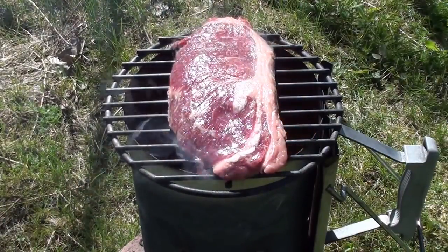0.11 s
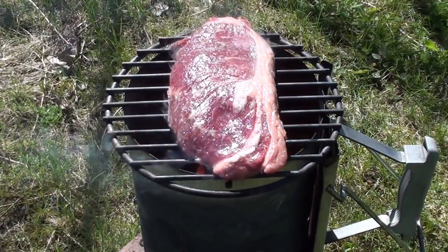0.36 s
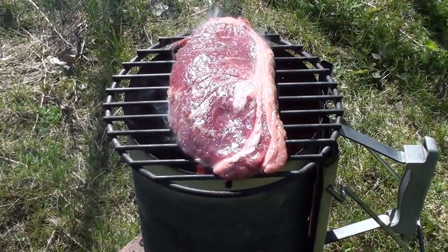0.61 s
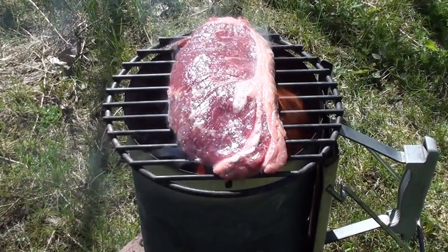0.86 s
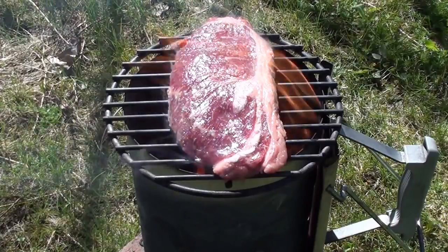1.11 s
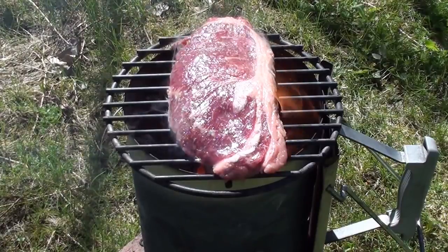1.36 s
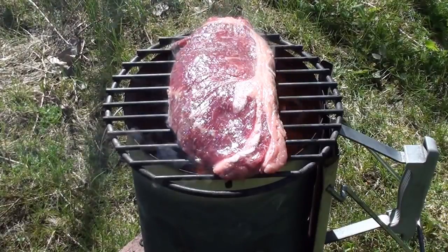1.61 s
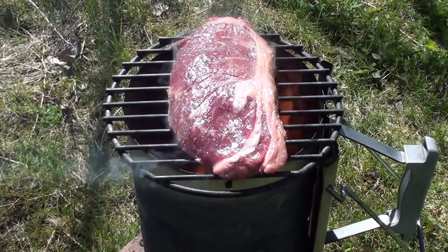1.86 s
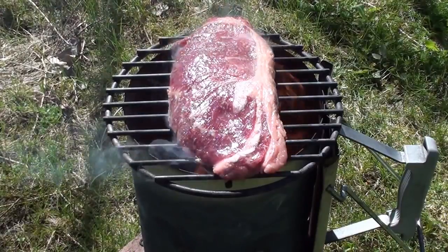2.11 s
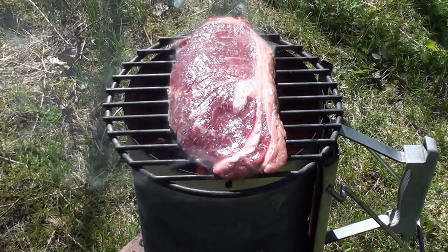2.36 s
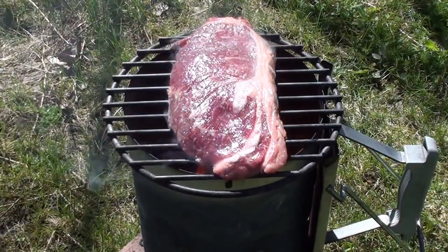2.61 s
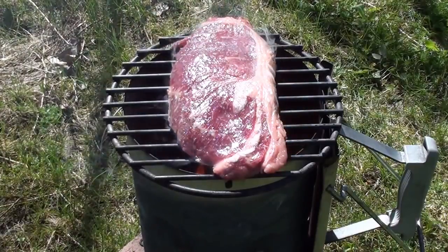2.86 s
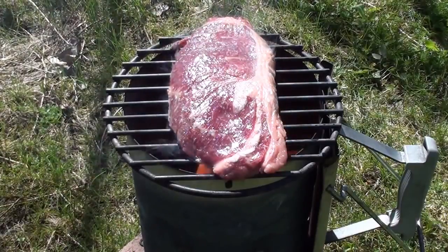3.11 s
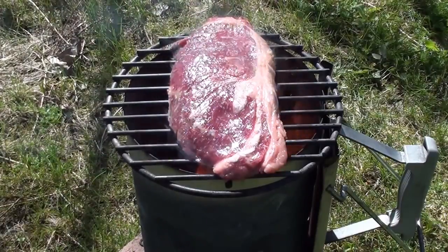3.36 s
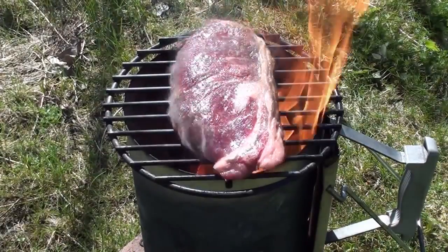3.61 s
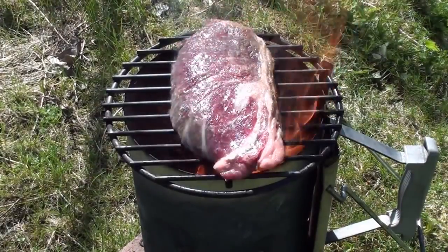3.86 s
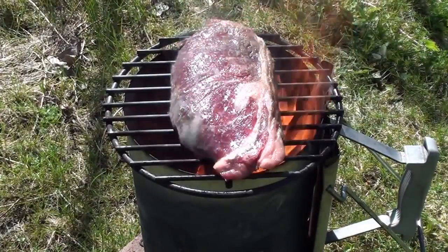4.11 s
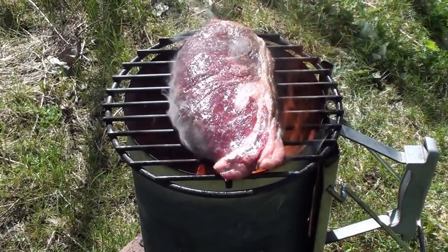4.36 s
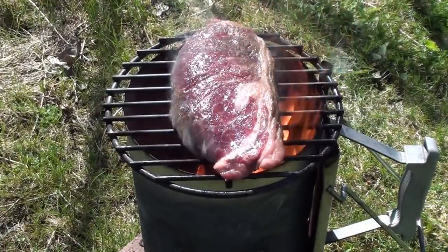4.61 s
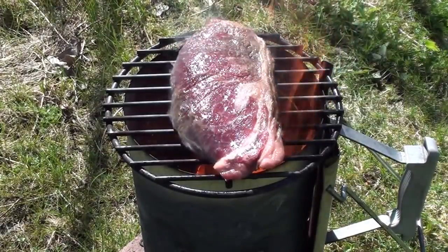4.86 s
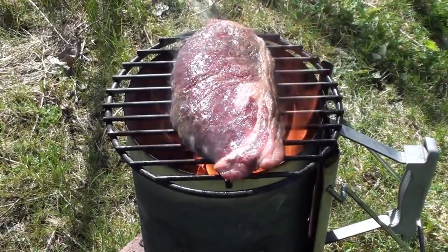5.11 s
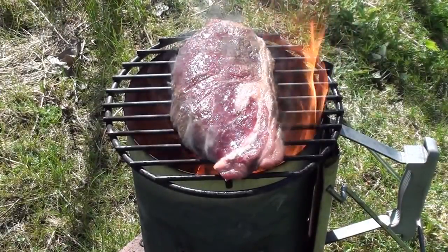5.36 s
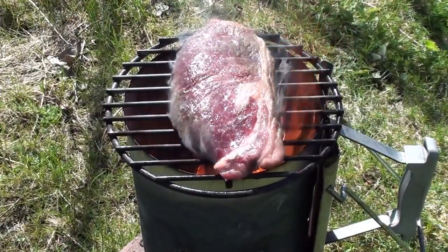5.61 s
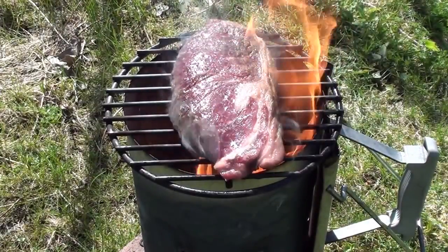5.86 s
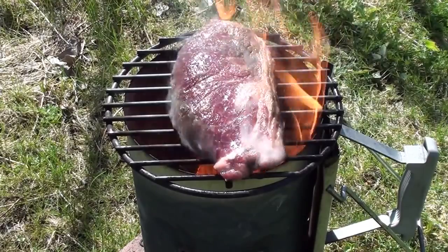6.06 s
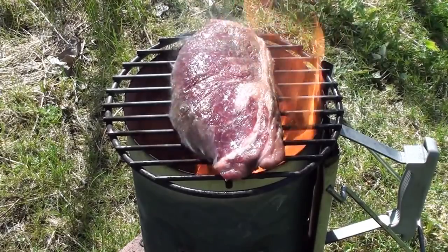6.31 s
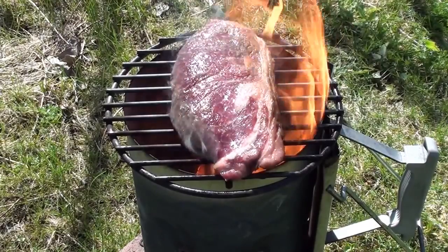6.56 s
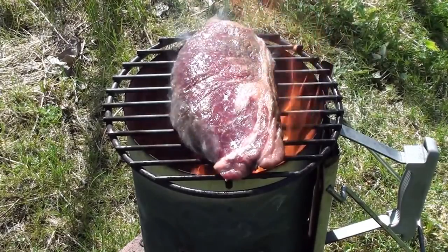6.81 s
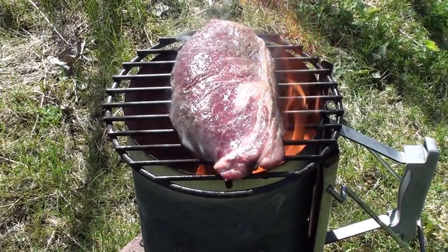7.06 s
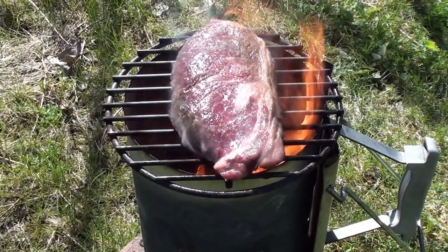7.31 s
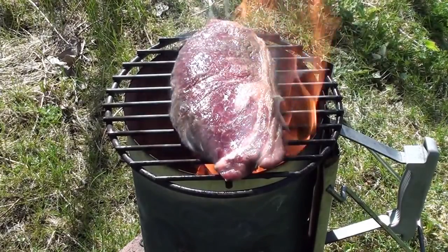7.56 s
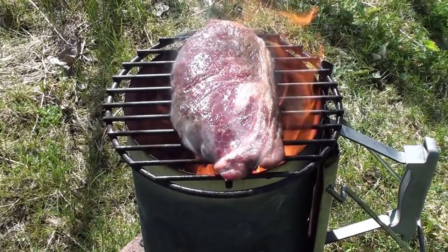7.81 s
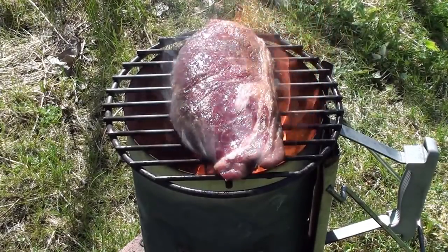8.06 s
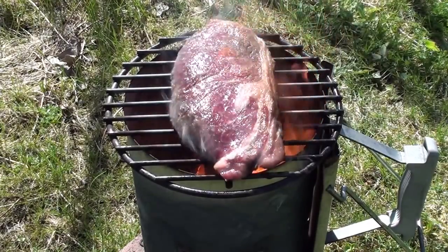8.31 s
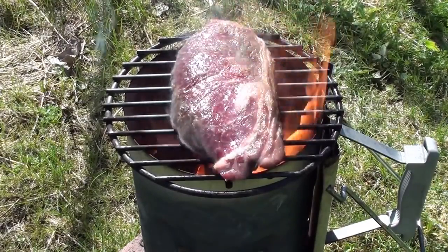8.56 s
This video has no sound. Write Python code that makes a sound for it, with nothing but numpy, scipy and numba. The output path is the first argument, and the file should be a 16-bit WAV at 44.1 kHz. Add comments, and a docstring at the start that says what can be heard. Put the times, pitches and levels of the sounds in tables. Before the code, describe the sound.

A steak sizzles fiercely over charcoal with sharp, dense crackles and hollow fat pops, early wind buffeting, and a distant engine humming late.

```python
"""On a lawn, a metre from a close pair of microphones, a steak sears on a grate over a steel chimney of charcoal.
Juice boils off as noise hiss and a dense fizz of wavelets, in spurts; fat bubbles burst as cracks and hollow knocks.
The chimney and the ground colour the sizzle and the cracks with peaks and dips.
Wind, as low fluttering noise, buffets the microphones at first; later a distant vehicle pulls away as gliding tones.
Behind it all lie a faint traffic drone, a low rumble, and faint ambience and microphone noise."""
import sys
import numpy as np
from scipy import signal
from scipy.fft import rfft, irfft
from scipy.io import wavfile
from scipy.ndimage import uniform_filter1d
from numba import njit

SR = 44100
rng = np.random.default_rng(int(sys.argv[2]) if len(sys.argv) > 2 else 0)


def wrap_up_sound(samples):
    """Save the sound to the file named by the first command line argument, as 16-bit audio."""
    columns = np.atleast_2d(samples).T
    # keep every value between -1 and 1, then stretch to whole-number steps
    tamed = np.clip(columns, -1, 1)
    steps = np.round(tamed * 32767).astype(np.int16)
    wavfile.write(sys.argv[1], SR, steps)


def how_loud(loudness_db):
    """Turn decibels into a plain amplitude multiplier (0 dB gives 1, 20 dB gives 10)."""
    steps = np.asarray(loudness_db, float) / 20
    return 10 ** steps


N = 383229
T = np.arange(N) / SR  # s
OPPOSITE = np.array([[1], [-1]])  # signs of a side signal on the two microphones


def curve(table):
    """Columns of a table after its time column, joined by lines and read at every sample."""
    s, *columns = np.transpose(table)
    return [np.interp(T, s, c) for c in columns]


def unit(x):
    """Scale to rms 1."""
    return x / np.sqrt(np.mean(x ** 2))


def noise():
    """White noise over the whole scene."""
    return rng.standard_normal(N)


def on_log(hz, points):
    """dB of (Hz, dB) points joined on a log axis."""
    f, db = np.transpose(points)
    return np.interp(np.log(hz + 1), np.log(f), db)


def response(points, dips=(), depth=1, size=2048):
    """Causal response with the given colour, from the folded cepstrum of its log gain; energy 1."""
    hz = np.fft.rfftfreq(size, 1 / SR)
    bumps = sum(d * np.exp(-.5 * (2 * (hz - f) / w) ** 2) for f, w, d in dips)
    db = on_log(hz, points) + bumps
    ceps = irfft(np.log(how_loud(depth * db)))
    # folding the late half onto the early half makes the response causal
    ceps[1:size // 2] *= 2
    ceps[size // 2 + 1:] = 0
    h = irfft(np.exp(rfft(ceps)))[:size // 2]
    return h / np.sqrt(np.sum(h ** 2))


def through(x, h):
    """Convolve and keep the length."""
    return signal.fftconvolve(x, h)[:N]


def walk(rate):
    """Random levels held 1 / rate s and slewed twice; spread 1."""
    k = int(SR / rate)
    steps = noise()[np.arange(N) // k]
    return unit(uniform_filter1d(uniform_filter1d(steps, k), k))


@njit
def grains(n, start, turn, decay, size):
    """Short wavelets: each swells and dies as t exp(-t), with height 1 at its crest, times its size."""
    out = np.zeros(n)
    for g in range(len(start)):
        z, p = np.e * decay[g] * size[g] + 0j, np.exp(1j * turn[g] - decay[g])
        for k in range(min(int(8 / decay[g]) + 1, n - start[g])):
            out[start[g] + k] += (k + 1) * z.real
            z *= p
    return out


def ring(s, hz, cycles, size):
    """Wavelets that begin at times s and crest after the given number of cycles."""
    hz = np.clip(hz, 100, .42 * SR).ravel()
    start = np.clip(s * SR, 0, N - 1).astype(np.int64).ravel()
    return grains(N, start, 2 * np.pi * hz / SR, hz / SR / cycles, 1. * size.ravel())


# Colour of the distant traffic: f/Hz, level/dB (per Hz, relative)
RUMBLE_COLOUR = [(15, -38), (25, -17), (32, -8.5), (97, 0), (156, 0.5), (198, -1.5), (300, -9.5),
                 (390, -30), (660, -120)]


def rumble():
    """Far traffic: low coloured noise that drifts slowly in level, the same on both microphones."""
    level = how_loud(-49 + 0.38 * walk(1.5))
    return level * unit(through(noise(), response(RUMBLE_COLOUR, size=8192)))


def tone(table, orders=((1, 0),)):
    """Tones on multiples of a gliding pitch, wavering as they cross the air; they fade in and out."""
    hz, db = curve(table)
    edge = np.clip(np.minimum(T - table[0][0], table[-1][0] - T) / 0.068, 0, 1)
    turns = 2 * np.pi * np.cumsum(hz) / SR
    tones = sum(how_loud(db + rel_db + 0.55 * walk(5)) * np.sin(k * turns) for k, rel_db in orders)
    return np.sqrt(2) * edge * tones


# Farther traffic drone: t/s, f/Hz, level/dB (rms before the wavering)
DRONE_GLIDE = [(1.8, 128, -60), (2.01, 146.0, -55.5), (6.5, 178, -66)]


def drone():
    """Farther traffic: one faint tone that glides upwards."""
    return tone(DRONE_GLIDE)


# Distant vehicle pulling away: t/s, firing f/Hz, level/dB (rms, to which each tone adds its own level)
ENGINE_RUN = [(4.5, 44, -58), (4.92, 46.6, -55), (5.1, 61.8, -51), (5.27, 81.5, -43), (5.5, 93.3, -47),
              (6.2, 97.3, -52), (6.5, 102, -46), (6.65, 106.3, -48), (7.05, 107, -48), (7.48, 121, -42.5),
              (7.85, 125, -43), (8.1, 123.8, -46.5), (8.38, 114, -48), (8.6, 91.3, -62)]
# Tones that follow the engine speed: multiple of the firing f, level/dB (relative)
ENGINE_ORDERS = [(1, -0.5), (0.62, -6), (2, -15)]


def vehicle():
    """Engine tones locked to the firing rate, rising and falling with the engine speed."""
    return tone(ENGINE_RUN, ENGINE_ORDERS)


# Colour of the wind at the microphones: f/Hz, level/dB (per Hz, relative)
BUFFET_COLOUR = [(15, -65), (25, -13), (103, 2.5), (190, -6), (248, -19.5), (375, -21), (500, -27),
                 (650, -42), (1100, -120)]
# Gusts on the microphones: t/s (crest), level/dB (shared part at the crest), rise/s, fall/s (to 1/e)
GUST_CRESTS = [(0.05, -44, .06, .2), (0.33, -38, 0.14, 0.15), (0.54, -29.5, 0.045, 0.072),
               (0.65, -36.5, 0.046, 0.055), (0.96, -40, 0.07, 0.076), (1.14, -35.5, .04, 0.034),
               (1.27, -46, .05, 0.17)]


def wind():
    """Gusts of low buffeting noise that flutters; the microphones share only part of it."""
    colour = response(BUFFET_COLOUR, size=8192)
    mid, side = (unit(through(noise() * how_loud(3.1 * walk(23.4)), colour)) for _ in range(2))
    gusts = 0
    for s, db, rise, fall in GUST_CRESTS:
        distance = np.where(T < s, (s - T) / rise, (T - s) / fall)
        gusts = gusts + how_loud(db) * np.exp(-distance)
    return gusts * (mid + how_loud(-8) * side * OPPOSITE)


# Colour of the ambience and microphone noise: f/Hz, level/dB (per Hz, relative)
AMBIENCE_COLOUR = [(60, -17), (200, -3.5), (700, 1.5), (1050, -1.5), (1400, -12), (2400, -22.5),
                   (15000, -33)]


def ambience(boil_db):
    """Faint ambience and microphone noise, unlike on the two sides, slightly stronger with the boiling."""
    level = how_loud(-61.5 + 0.17 * (boil_db - np.mean(boil_db)))
    return unit(through(noise(), response(AMBIENCE_COLOUR))) * level


# Colour of the sizzle at the microphones: f/Hz, level/dB (per Hz, relative)
SIZZLE_COLOUR = [(150, -15.5), (300, -8), (600, -5.5), (1100, -4.5), (2100, -10), (3500, -8), (5000, -5.5),
                 (5900, -2.5), (7500, -4.5), (9200, 0), (11000, -4.5), (12200, -9), (14000, -9),
                 (15600, -10.5)]
# Narrow bands cancelled or lifted by echoes from chimney and ground: f/Hz, width/Hz, level/dB
ECHO_BANDS = [(830, 194, -5.5), (1374, 240, -6.5), (2410, 190, -7), (2940, 214, -5.5), (4020, 220, -3.5),
              (5460, 270, -1.5), (6960, 160, -5), (8310, 540, -2), (2200, 480, 3.5), (11200, 470, 0.5)]
# Resonances of the cool air around the grate: f/Hz, width/Hz, level/dB
AIR_HOLLOWS = [(6000, 210, 2), (7600, 220, 1.5), (9000, 260, 2)]


def chimney(rise=1, depth=1):
    """Path from grate to microphones: echoes and air resonances, the latter raised in pitch by heat."""
    hollows = [(hz * rise, w, db) for hz, w, db in AIR_HOLLOWS]
    return response(SIZZLE_COLOUR, ECHO_BANDS + hollows, depth)


def heated(juice):
    """Sizzle through the chimney; flames heat the air and raise its resonances by 6 %."""
    cool, hot = (through(juice, chimney(rise)) for rise in (1, 1.06))
    heat = np.clip((T - 3.75) / .3 + .5, 0, 1)  # crossfade centred on 3.75 s, 0.3 s long
    return cool + heat * (hot - cool)


# Steady boiling: t/s, level/dB (sizzle, before the surges)
STEADY_BOIL = [(0.0, -28.5), (0.7, -28), (1.1, -28), (1.7, -28), (2.3, -27.5), (3.0, -28.5), (3.7, -25.5),
               (3.85, -31.5), (4.9, -31), (5.4, -30), (6.3, -28.5), (6.9, -28.5), (7.4, -29), (7.9, -29.5),
               (8.69, -28)]
# Juice runs onto the hot bars and boils up: t/s (full height reached), hold/s, level/dB (lift),
# level/dB (change of the lower sizzle, up or down)
JUICE_SURGES = [(0.146, 0.083, 2, 1), (0.383, 0.16, 3, 0.5), (0.758, 0.19, 3.5, 2.5), (1.265, 0.15, 4, -1),
                (1.926, 0.082, 3.5, 2), (2.359, 0.1, 4, -3), (3.02, 0.086, 2.5, 0.5), (3.401, 0.19, 3.5, 0),
                (3.962, 0.077, 4.5, -1.5), (4.24, 0.1, 2.5, -1.5), (4.707, 0.082, 2.5, -2),
                (5.077, .1, 1.5, 1), (5.534, .05, 1, -1.5), (5.81, 0.1, 3, -2), (6.35, 0.19, 2, -0.5),
                (8.006, 0.048, 4, -1.8), (8.414, .1, 1, -1)]


def boiling():
    """Level of the sizzle and change of its lower part in dB: steady boiling plus surges that die away."""
    start, hold, lift_db, low_db = np.transpose(JUICE_SURGES)[:, :, None]
    attack_s, release_s = 0.02, 0.027
    rise = np.clip((T - start) / attack_s + 1, 0, 1)
    fall = np.exp(-np.clip(T - start - hold, 0, None) / release_s)
    shape = rise * fall
    return curve(STEADY_BOIL)[0] + np.sum(lift_db * shape, axis=0), np.sum(low_db * shape, axis=0)


# Bubbles bursting at set times, loud and soft: t/s, level/dB (nominal peak of the crack), f/Hz (crack)
SET_POPS = [(0.2017, -5, 9150), (0.2536, -5, 8200), (0.2703, -5.5, 7250), (0.7738, -8, 7760),
            (0.815, -10, 7000), (0.8378, -7.5, 5700), (0.9392, -11.5, 6200), (0.9844, -3, 8000),
            (1.1547, -9, 6700), (1.1978, -5.5, 7760), (1.3015, -7, 8200), (1.3115, -12, 9000),
            (1.3861, -10, 10400), (1.4366, -6.5, 7600), (1.454, -8, 10600), (1.5924, -5.5, 8000),
            (2.0627, -5.5, 8000), (2.1593, -7, 8850), (2.372, -8.5, 3570), (2.3877, -7, 9000),
            (2.512, -10, 12000), (2.8371, -20, 9400), (2.8685, -13, 10300), (3.0422, -11, 6000),
            (3.2682, -7.5, 6800), (3.3958, -5, 8700), (3.444, -5, 6700), (3.4596, -2, 10200),
            (3.5033, -6, 7500), (3.642, -6, 10200), (3.7605, -15, 10000), (3.9146, -7, 10400),
            (4.097, -6, 11200), (4.1439, -5.5, 9900), (4.2405, -15, 8550), (4.281, -8, 12100),
            (4.3105, -7.5, 7400), (4.4094, -14, 10800), (4.5093, -2, 11900), (4.5553, -5, 10700),
            (4.7183, -9, 6940), (4.761, -7, 12000), (4.8443, -4.5, 7600), (5.0656, -5, 9800),
            (5.1093, -5.5, 9000), (5.2639, -6.5, 12200), (5.287, -4.5, 11600), (5.5455, -2, 11000),
            (5.6429, -7, 11020), (5.6784, -6.5, 10500), (5.7733, -2, 9500), (5.8988, -9, 11200),
            (5.9584, -4.5, 7260), (5.9652, -7.5, 7200), (6.0173, -4, 11530), (6.0283, -3.5, 5400),
            (6.0619, -8, 8700), (6.1245, -6, 6370), (6.168, -10, 6500), (6.2257, -9, 9600),
            (6.3433, -7.5, 12670), (6.3622, -11, 6300), (6.3853, -5, 11800), (6.5906, -10, 8140),
            (6.9024, -8, 9200), (6.9715, -15, 12100), (6.9778, -5.5, 9600), (7.0138, -9, 8300),
            (7.0205, -14, 12100), (7.083, -21, 10400), (7.3392, -10, 6480), (7.436, -5.5, 9900),
            (7.4882, -11, 10800), (7.5093, -5, 9540), (7.5482, -7, 7420), (7.6704, -5, 8300),
            (7.9886, -19, 7300), (8.011, -10, 9800), (8.0207, -8, 7490), (8.0794, -13, 7400),
            (8.1177, -5, 11700), (8.2178, -8.5, 7700), (8.236, -12, 11100), (8.284, -13, 6900),
            (8.3151, -9.5, 7240), (8.325, -10, 11100), (8.3557, -5.5, 7460), (8.4135, -6, 11380),
            (8.439, -8, 4840), (8.4585, -1.5, 7900), (8.4624, -2, 7900), (8.4866, -6.5, 6200),
            (8.4921, -9, 9800), (8.5602, -3.5, 6300), (8.567, -5, 8800), (8.585, -5.5, 7650)]


def bubbles(count=70):
    """Rows (s, peak dB, Hz) of all bursts: those at set times, then further ones at random."""
    when, soft, pitch = rng.random((count, 3)).T
    low_hz, high_hz = 7000, 12500
    further = np.transpose([when * T[-1], -8.5 - 3 * soft, low_hz + (high_hz - low_hz) * pitch])
    return np.vstack([SET_POPS, further])


def puffs(bursts):
    """Each pop lets out a puff of steam that dies in a few milliseconds; gain on the hiss."""
    s, db, _ = bursts.T
    kicks = np.bincount((s * SR).astype(int), how_loud(db + 11), N)
    return 1 + through(kicks, np.exp(-np.arange(1000) / (.003 * SR)))


def sizzle(bursts):
    """Steam hiss and brief droplets; both come in spurts of a few milliseconds and longer."""
    spurts = 2.25 * walk(22) + 2.3 * walk(90) + 2.0 * walk(320)
    hiss = unit(noise() * how_loud(0.23 * spurts) * puffs(bursts))
    when, pitch, sign, big = rng.random((4, 30000))
    db = -4.5 * np.log(1 - big) + 0.5 * spurts[(when * N).astype(int)]
    # a soft limit on the random droplet sizes keeps rare ones from sticking out
    size = np.sign(sign - .5) * how_loud(23 * np.tanh(db / 23))
    hz = 450 + 18000 * pitch
    # small droplets are brief, so they get more height for the same energy
    fizz = ring(when * T[-1], hz, 0.47, size * np.sqrt(hz))
    return unit(hiss + how_loud(3.5) * unit(fizz))


# Big fat bubbles collapsing with a hollow note: t/s, level/dB (peak of the note), f/Hz (note)
FAT_KNOCKS = [(0.1892, -26, 2100), (0.2703, -19, 2200), (0.815, -28, 2230), (0.838, -19, 2300),
              (0.8582, -29.5, 540), (0.932, -22, 2170), (0.955, -23, 2230), (0.9843, -24, 1750),
              (1.054, -25, 2160), (1.9204, -21, 2200), (2.006, -20.5, 1670), (2.0647, -22.5, 2120),
              (2.1604, -26, 1940), (2.3704, -16, 1690), (3.443, -23, 1860), (4.239, -27, 1130),
              (4.311, -24.5, 2060), (4.7198, -26, 1080), (4.8207, -28, 675), (4.8434, -20.5, 1010),
              (5.7731, -20.5, 1600), (5.79, -31.5, 480), (5.9236, -29, 1090), (5.9568, -29, 1720),
              (6.0276, -29, 1080), (6.1671, -21, 2200), (6.413, -25.5, 1980), (6.4432, -23, 1630),
              (6.5112, -19, 2190), (7.8604, -23.5, 1666), (8.2848, -26, 1970), (8.3964, -26, 1830),
              (8.4617, -21, 1450), (8.509, -25.5, 1900), (8.5633, -24, 2170)]
# Colour of a splash of fat: f/Hz, level/dB (per Hz, relative)
SPLASH_COLOUR = [(120, -25), (250, 3), (1500, -8.5), (4000, -5.5), (9000, 3.5)]


def knocks():
    """A blunt slap, a hollow note of a few cycles, a detuned rebound and a broad splash of fat."""
    s, db, hz = np.transpose(FAT_KNOCKS)
    lag, detune, slap_pitch = rng.random((len(s), 3)).T
    slap = ring(s, hz * (1.6 + 0.58 * slap_pitch), 1.0, how_loud(db - 1.0))
    note = ring(s, hz, 0.85, how_loud(db))
    rebound = ring(s + 0.00168 + 0.00288 * lag, hz * (0.32 + 1.37 * detune), 0.38, how_loud(db))
    kicks = np.bincount((s * SR).astype(int), how_loud(db - 1), N)
    fade = through(kicks, np.exp(-np.arange(600) / (0.0032 * SR)))
    splash = fade * unit(through(noise(), response(SPLASH_COLOUR)))
    return slap + note + rebound + splash


def pops(bursts, count=4):
    """A crack and weaker spatters after it, each pop at its own place; returns mid and side."""
    path = chimney(depth=0.6)  # a brief crack shows only this share of the colouring
    s, db, hz = bursts.T[:, :, None]
    usual_hz = np.median(hz, 0)
    chance = rng.random((len(bursts), 3 * count + 1))
    after = np.arange(count) > 0  # the first is the crack, the rest are spatters
    late = 0.0033 * chance[:, :count] * after
    size = how_loud(db - (5.5 + 10.2 * chance[:, count:2 * count]) * after)
    pitch = hz * (1 + 1.45 * (chance[:, 2 * count:-1] - .5) * after)
    # a crack of median pitch reaches the microphones at about its stated peak
    typical = ring(np.zeros(1), usual_hz, .5, np.ones(1))[:99]
    path = path / np.max(np.abs(np.convolve(typical, path)))
    # cracks in weak bands of the colouring start out a little stronger
    size = size * how_loud(-.15 * (on_log(hz, SIZZLE_COLOUR) - on_log(usual_hz, SIZZLE_COLOUR)))
    place = 0.22 * (2 * chance[:, -1:] - 1) ** 5  # most lie near the middle
    return (through(ring(s + late, pitch, 0.62, size * w), path) for w in (1, place))


def scene():
    """Sizzle and pops through chimney and ground, slightly wide, over wind and traffic."""
    traffic = rumble() + drone() + vehicle()
    boil_db, low_db = boiling()
    bursts = bubbles()
    boil = heated(sizzle(bursts))
    low = signal.sosfiltfilt(signal.butter(2, 3400, fs=SR, output="sos"), boil)
    # each surge raises or lowers the lower sizzle by its own amount
    sear = how_loud(boil_db) * (boil - low + how_loud(low_db) * low)
    crack, crack_side = pops(bursts)
    side = ambience(boil_db) + crack_side
    return traffic + wind() + side * OPPOSITE + sear + knocks() + crack


def roll_off(x):
    """The treble ends steeply here."""
    return signal.sosfilt(signal.butter(12, 16980, fs=SR, output="sos"), x)


def record(dry):
    """The camera drops the deepest bass, rounds the highest peaks and cuts the top steeply."""
    thin = signal.sosfilt(signal.butter(2, 36, "high", fs=SR, output="sos"), dry)
    rounded = np.tanh(1.15 * thin) / 1.15
    cut = signal.sosfilt(signal.ellip(10, .2, 44, 15650, fs=SR, output="sos"), rounded)
    return roll_off(cut)


dry = scene()
out = record(dry)
wrap_up_sound(out)
```